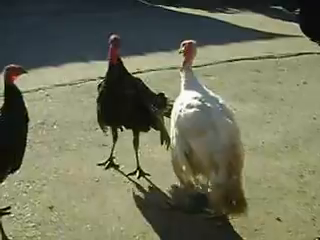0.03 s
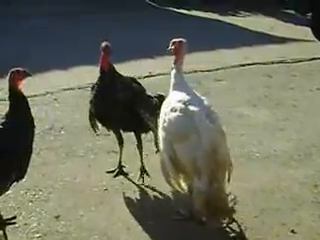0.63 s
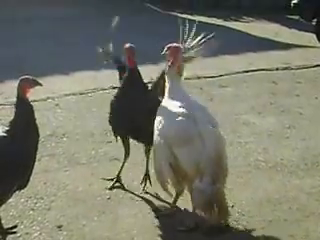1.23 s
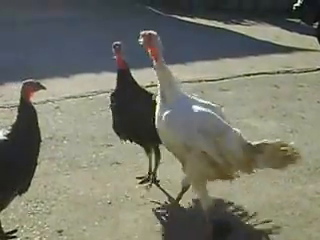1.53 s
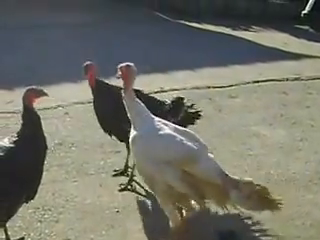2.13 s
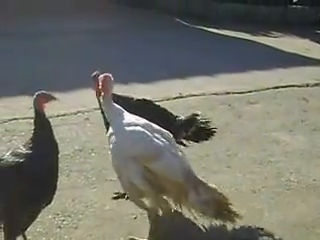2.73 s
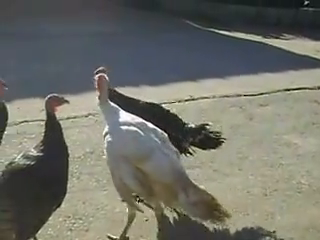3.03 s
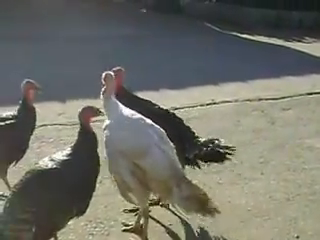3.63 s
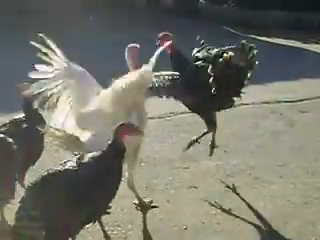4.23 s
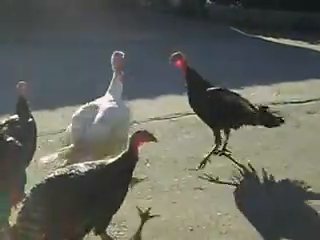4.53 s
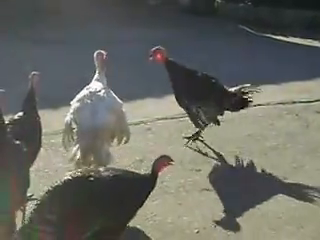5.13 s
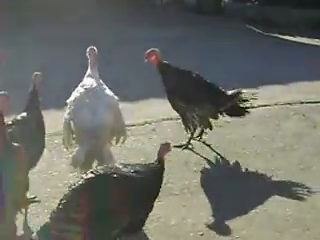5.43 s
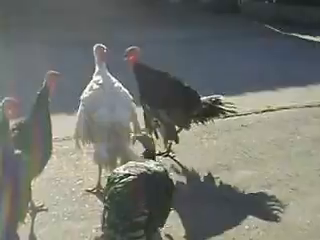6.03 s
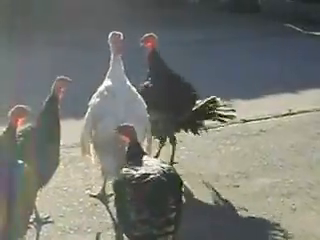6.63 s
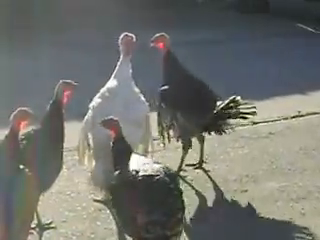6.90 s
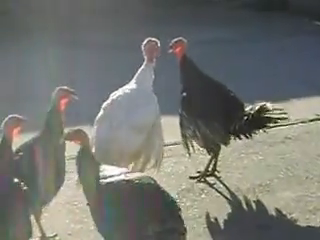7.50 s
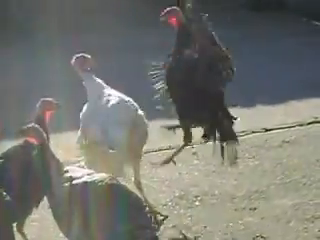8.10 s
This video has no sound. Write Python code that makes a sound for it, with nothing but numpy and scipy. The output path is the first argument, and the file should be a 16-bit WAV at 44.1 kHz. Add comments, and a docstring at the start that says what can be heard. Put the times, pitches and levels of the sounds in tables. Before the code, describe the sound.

Turkeys gobble and yelp in short rattling bursts in a paved yard, with a few flurries of slapping wings.

```python
"""A paved yard, where turkeys gobble at each other and squabble with beating wings.
A gobble opens with a falling whistle or a leaping cry, drops to a low held note and breaks into
a rattle with runs of sharp yelps. Feathers slap, wings push air and feet land on the pavement.
Walls echo the birds over faint outdoor air. The microphone is a small camera's: mono, with grit
that follows the loudness and with the treble cut."""
import sys
import numpy as np
from scipy import signal
from scipy.fft import rfft, irfft, next_fast_len
from scipy.io import wavfile

SR = 44100
rng = np.random.default_rng(int(sys.argv[2]) if len(sys.argv) > 2 else 0)


def output_pcm(signal):
    """Save a mono or channel-first signal as 16-bit PCM at the path in sys.argv[1].

    Samples are clipped to [-1, 1] before scaling.
    """
    pcm = np.clip(np.atleast_2d(signal).T, -1, 1) * 32767
    wavfile.write(sys.argv[1], SR, np.round(pcm).astype(np.int16))


N = 364266
TIME = np.arange(N) / SR


def gobbles(shake_hz=41.0, swing_octaves=.5, throb_db=2.0, flutter_db=3.5, crack_db=-16.5):
    """A whistling syrinx: a little roughness doubles its period, more shakes it into a rattle."""
    pitch, level_db, rough, second_db, gate = gobble_controls()
    doubling = np.clip(rough / .43, 0, 1)
    rattle = np.clip((rough - .32) / .35, 0, 1)
    # the shaking throat chops the tone into chirps, each starting high and dropping to the pitch
    shake = 2 * np.pi * np.cumsum(shake_hz * (1 + .4 * wander(25))) / SR
    pitch = pitch * 2 ** (rattle * swing_octaves * ((1 + np.cos(shake)) / 2) ** 2)
    pitch = pitch * (1 + .016 * wander(130) + .07 * rattle * wander(305))   # jitter
    level_db = level_db + rattle * throb_db * np.sin(shake)
    # even held notes crack for a moment now and then
    cracks = np.clip(wander(70) - 1, 0, 1)
    level_db += crack_db * cracks * (1 + doubling) / 2
    level_db += flutter_db * rough * wander(250)
    pitch, level_db = with_yelps(pitch, level_db)
    return gate * from_db(level_db) * syrinx(pitch, doubling, second_db)


def gobble_controls():
    """Pitch, level, roughness, second partial and gate; where notes meet, the louder one leads."""
    # Leaping cries. Each row: start and length in seconds, pitch aimed at in Hz, level in dB.
    cries = [(0.348, 0.021, 1143, -22.5), (0.654, 0.043, 1172, -16), (1.972, 0.11, 1061, -25.5),
             (3.017, 0.021, 1050, -26.5), (3.355, 0.0607, 1234, -17), (3.457, .1, 1230, -17),
             (4.409, 0.044, 1100, -24.5), (4.713, .052, 1209, -18.5), (7.233, .044, 1172, -17),
             (7.298, .04, 1050, -27.5), (7.575, 0.062, 1181, -13), (8.246, .05, 1090, -14)]
    # Low held notes. Each row: start and length in seconds, pitch in Hz, level in dB,
    # lift of the second partial in dB.
    holds = [(0.379, 0.078, 645.8, -16.5, 1), (0.914, 0.071, 812, -16.5, -3),
             (1.589, .018, 724, -14.5, 4.5), (1.655, 0.084, 599.8, -14, 6), (2.431, 0.14, 619, -13.5, 0.5),
             (3.038, 0.016, 666, -17.5, 1), (3.655, 0.091, 650.7, -15.5, 0),
             (4.764, 0.0319, 708.8, -15, 7.5), (5.112, 0.066, 621.4, -20.5, -6.5),
             (5.179, 0.0317, 654.6, -14.5, 5), (6.352, 0.089, 657.2, -21, -1.5),
             (7.346, 0.082, 631, -16, 7)]
    # Rattles. Each row: start and length in seconds, pitch in Hz, first and last level in dB.
    rattles = [(0, 0.093, 676.2, -22.5, -23.5), (0.471, 0.24, 649, -20, -17), (1.003, 0.17, 709, -25, -23),
               (1.74, 0.082, 617.2, -16.5, -20), (2.362, .07, 745, -20.5, -19),
               (2.589, 0.15, 620, -20.5, -19.5), (3.084, .365, 738.7, -24, -24.5),
               (3.77, .14, 795, -19.5, -19.5), (4.508, .2, 757.7, -22, -28), (4.81, 0.19, 700, -27.5, -33),
               (5.229, 0.2, 645.3, -20, -26.5), (5.915, 0.24, 677, -20.5, -32.5),
               (6.451, 0.21, 670.3, -26.5, -21), (6.805, .25, 760.4, -26.5, -29.5),
               (7.454, 0.17, 659, -19, -18), (7.866, 0.27, 706, -20, -26)]
    controls, weight, gate = np.zeros((4, N)), np.full(N, 1e-12), np.zeros(N)
    for shape, notes in ((cry, cries), (held_note, holds), (rattle_note, rattles)):
        for start, length, *row in notes:
            span, age, envelope = note_window(start, length, attack_s=.0038, release_s=.021)
            pitch, level_db, rough, second_db = np.broadcast_arrays(*shape(age, length, *row))
            power = (envelope * from_db(level_db)) ** 2
            controls[:, span] += power * [pitch, level_db, rough, second_db]
            weight[span] += power
            gate[span] += envelope
    return [*(controls / weight), np.minimum(gate, 1)]


def cry(age, length, top_hz, level_db, fade_db_per_s=78, rough=.1, second_db=-2.5):
    """The pitch leaps up, then sinks ever faster while the note fades."""
    leap_octaves = .5 * np.exp(-age / .011)
    sink_octaves = .6 * (age / .1) ** 2
    pitch = top_hz * 2 ** -(leap_octaves + sink_octaves)
    return pitch, level_db - fade_db_per_s * age, rough, second_db


def held_note(age, length, hz, level_db, second_db, rise_octaves_per_s=.585, swell_db_per_s=30):
    """Growing effort lifts pitch and level a little, until the note starts to break."""
    from_middle = age - length / 2
    pitch = hz * 2 ** (rise_octaves_per_s * from_middle)
    rough = np.interp(age, [0, length], [.171, .4])
    return pitch, level_db + swell_db_per_s * from_middle, rough, second_db


def rattle_note(age, length, hz, first_db, last_db, second_db=-.5):
    """The voice gets rougher toward the end of the gobble."""
    level_db = np.interp(age, [0, length], [first_db, last_db])
    rough = np.interp(age, [0, length], [.66, .85])
    return hz, level_db, rough, second_db


def yelps(gap_s=.05):
    """Time, pitch and level of every yelp; a run is filled at the bird's steady pace."""
    # Runs of sharp yelps. Each row: start and length in seconds (0 for a single yelp),
    # pitch in Hz, first level in dB, growth over the run in dB.
    yelp_runs = [(0.035, .048, 1290, -12, -1.5), (0.667, 0, 1113, -7, -2), (0.936, .04, 1280, -18, 2.5),
                 (1.038, .095, 1285, -11.5, 4), (1.762, .045, 1155, -12.5, 7.5),
                 (2.628, .106, 1120, -12, -2.5), (3.194, .148, 1210, -16, 4), (3.39, 0, 1123, -10, 4),
                 (3.826, .051, 970, -10.5, -1), (3.903, 0, 962, -6.5, 0), (4.552, .111, 1156, -15, -1),
                 (4.842, .117, 1120, -19.5, 1.5), (5.376, 0, 1249, -15, 0.5), (5.452, 0, 1203, -24, 3),
                 (6.039, .092, 1326, -22, 4.5), (6.558, .093, 1320, -14, 0), (6.813, .062, 1143, -17.5, 1),
                 (6.918, .095, 1230, -15, -0.5), (7.478, .058, 1150, -12.5, -3), (7.586, 0, 1132, -4, -3),
                 (7.951, 0, 1143, -11.5, 6), (8.052, .101, 1230, -14.5, 5)]
    for start, length, hz, level_db, growth_db in yelp_runs:
        count = round(length / gap_s) + 1
        yield from np.linspace((start, hz, level_db), (start + length, hz, level_db + growth_db), count)


def with_yelps(pitch, level_db, swoop_s=.0082, glide_octaves=.3, catch_db=-1.5):
    """The throat catches, yelps on a rising pitch, then chirps more softly on the way back down."""
    pitch, level_db = pitch.copy(), level_db.copy()
    for at_s, yelp_hz, yelp_db in yelps():
        span = slice(max(0, int((at_s - .06) * SR)), int((at_s + .06) * SR))
        width_s = .0031 * 2 ** ((yelp_db + 13) / 16)   # twice as long for every 16 dB louder
        for delay_s, direction, softer_db in ((.025, -1, -11.5), (0, 1, 0)):   # way down, yelp
            age = TIME[span] - at_s - delay_s
            chirp_hz = yelp_hz * 2 ** (direction * glide_octaves * np.tanh(age / swoop_s))
            pitch[span] += (chirp_hz - pitch[span]) * np.exp(-(age / swoop_s) ** 4)
            level_db[span] += catch_db * np.exp(-(age / width_s + 2) ** 2)
            level_db[span] += (yelp_db + softer_db - level_db[span]) * np.exp(-(age / width_s) ** 2)
    return pitch, level_db


def syrinx(pitch, doubling, second_db, half_db=-3.5):
    """Partials of the pitch, and weaker ones halfway between, shaped by the throat; unit power."""
    # Spectrum at the syrinx. Each row: multiple of the pitch, level in dB.
    partials = [(1, 4), (2, -4.5), (2.5, -7.5), (3, -15), (8, -50)]
    # Resonances of throat and beak. Each row: frequency in Hz, gain in dB.
    throat = [(450, -33), (600, -4), (750, 1.5), (950, -0.5), (1280, 7), (1600, 0), (1780, -11),
              (1950, -13), (2200, -4), (2500, -23), (4500, -13)]
    phase = 2 * np.pi * np.cumsum(pitch) / SR
    half_share = doubling * from_db(half_db + 2 * wander(29))
    voice, power = 0, 0
    for multiple in np.arange(1, 17) / 2:
        gain = gain_at(partials, multiple) * gain_at(throat, multiple * pitch)
        if multiple % 1:
            gain *= half_share
        if multiple == 2:
            gain *= from_db(second_db)
        voice += gain * np.sin(multiple * phase)
        power += gain ** 2 / 2
    return voice / np.sqrt(power)


def whistles(swell_db=3, swell_s=.035, flutter_db=3.5, waver_share=.03):
    """A reedy note swells as it falls, and grows unsteady toward its end."""
    # Whistles that open a gobble or answer one. Each row: start and length in seconds,
    # first and last pitch in Hz, level in dB, second partial in dB.
    notes = [(0.851, 0.07, 1039, 933, -20.5, -2.5), (1.233, 0.079, 1052, 1026, -27.5, -30),
             (1.282, .09, 872, 858, -25.5, -29), (1.546, 0.043, 1075, 898, -21.5, 2.5),
             (2.303, .062, 1019, 912, -21, -1), (3.088, 0.06, 1036, 991.6, -25, 1),
             (4.461, 0.04, 1059, 949, -18, -7), (5.816, 0.055, 1026, 943, -22, -12),
             (5.891, 0.016, 900, 780, -15, -8.5), (6.744, 0.062, 1130, 933, -26.5, -5),
             (7.838, 0.058, 1086, 1015, -19, -1.5)]
    # The whistle's other partials. Each row: multiple of the pitch, level in dB.
    partials = [(1, 5), (1.5, -16), (2.5, -23), (3, -16.5), (4, -21), (5, -23.5)]
    out, waver, flutter = np.zeros(N), wander(200), wander(170)
    for start, length, first_hz, last_hz, level_db, second_db in notes:
        span, age, envelope = note_window(start, length, attack_s=.005, release_s=.02)
        along = age / length
        pitch = (first_hz + (last_hz - first_hz) * along) * (1 + waver_share * along * waver[span])
        phase = 2 * np.pi * np.cumsum(pitch) / SR
        tone = sum(from_db(db) * np.sin(multiple * phase) for multiple, db in partials + [(2, second_db)])
        note_db = level_db + swell_db * (.5 - np.exp(-age / swell_s))
        note_db += flutter_db * along * flutter[span]
        out[span] += envelope * from_db(note_db) * rms_one(tone)
    return out


def note_window(start, length, attack_s, release_s):
    """The samples that a note covers, its age in them and its attack-hold-release envelope."""
    corners = [start - attack_s, start + attack_s, start + length, start + length + release_s]
    span = slice(*np.searchsorted(TIME, [corners[0], corners[-1]]))
    return span, np.clip(TIME[span] - start, 0, length), np.interp(TIME[span], corners, [0, 1, 1, 0])


def wings():
    """Stiff feathers slap and rustle, each adding its grain; the wing beats push air in dull thuds."""
    # Slaps of feathers and claws. Each row: start in seconds, level in dB.
    slap_times = [(0.246, -45), (1.395, -25), (2.074, -30.5), (4.090, -15), (4.099, -15.5), (4.139, -22),
                  (4.226, -47), (4.815, -30), (7.950, -21), (8.152, -25)]
    # Their bright spectrum. Each row: frequency in Hz, level in dB.
    slap_colour = [(150, 0), (600, -7.5), (1200, 5), (2300, 0.5), (3500, 2.5), (5200, 1.5), (6500, -22)]
    # Wing beats. Each row: start in seconds, level in dB.
    wing_beats = [(1.393, -14.5), (1.412, -42), (4.093, -21.5), (4.138, -19), (7.955, -15), (8.098, -23.5),
                  (8.145, -20.5)]
    # Spectrum of the pushed air. Each row: frequency in Hz, level in dB.
    thud_colour = [(40, -4.5), (120, -2), (280, -3.5), (650, 5.5), (1000, 4), (2000, -7.5), (5000, -33)]
    slaps = blows(slap_times, slap_colour, rise_s=.00026, t60=.08, grain_db=4.0)
    rustle = from_db(-22) * blows(slap_times, slap_colour, rise_s=.026, t60=.64, grain_db=3.0)
    thuds = blows(wing_beats, thud_colour, rise_s=.00087, t60=.17, grain_db=3.0)
    return slaps + rustle + thuds


def feet():
    """Feet land on the pavement with soft, low knocks."""
    # Footfalls. Each row: start in seconds, level in dB.
    footfalls = [(4.350, -21.5), (4.618, -24.5), (4.680, -24.5), (5.052, -30.5)]
    # Spectrum of a footfall. Each row: frequency in Hz, level in dB.
    foot_colour = [(60, -17), (160, -4), (280, 7.5), (400, -9), (600, -8.5), (2000, -32.5)]
    return blows(footfalls, foot_colour, rise_s=.0053, t60=.13, grain_db=2.5)


def blows(events, colour, rise_s, t60, grain_db):
    """Each blow is a puff of grainy noise that falls 60 dB in t60 seconds."""
    envelope = np.zeros(N)
    for start_s, level_db in events:
        start = int(start_s * SR)
        age = TIME[:min(SR // 2, N - start)]
        rise = 1 - np.exp(-age / rise_s)
        envelope[start:start + len(age)] += rise * from_db(level_db - 60 * age / t60)
    return envelope * rms_one(noise(colour) * from_db(grain_db * wander(270)))


def yard_echo(sound, t60=.41, tail_db=-8.0, build_s=.0076):
    """The walls send two echoes and a diffuse tail back to the microphone, all dulled."""
    age = TIME[:SR]
    tail = rng.standard_normal(SR) * from_db(-60 * age / t60) * (1 - np.exp(-age / build_s))
    response = from_db(tail_db) * tail / np.sqrt(np.sum(tail ** 2))
    for delay_s, echo_db in ((.024, -14.5), (.056, -18.5)):
        response[int(delay_s * SR)] += from_db(echo_db)
    dull = signal.butter(1, 3500, fs=SR, output="sos")
    return signal.fftconvolve(sound, signal.sosfilt(dull, response))[:N]


def outdoor_air(level_db=-48):
    """A faint, steady rush behind the birds."""
    # Spectrum of the open air. Each row: frequency in Hz, level in dB.
    air_colour = [(30, 4), (100, -6), (300, -5.5), (1200, -4), (2000, -10.5), (5500, -22.5)]
    return from_db(level_db) * noise(air_colour)


def from_db(db):
    """Decibels to gain."""
    return 10 ** (np.asarray(db) / 20)


def rms_one(x):
    """Scale to unit power."""
    return x / np.sqrt(np.mean(x ** 2) + 1e-20)


def gain_at(colour, hz):
    """Read a spectrum on a log-frequency axis."""
    points, level_db = np.transpose(colour)
    return from_db(np.interp(np.log(np.maximum(hz, 1)), np.log(points), level_db))


def noise(colour):
    """Steady noise of a given colour, unit power."""
    size = next_fast_len(N)
    hz = np.arange(size // 2 + 1) * SR / size
    return rms_one(irfft(rfft(rng.standard_normal(size)) * gain_at(colour, hz), size)[:N])


def wander(rate_hz):
    """Smooth random drift up to about rate_hz, unit power."""
    smooth = signal.butter(2, rate_hz, fs=SR, output="sos")
    return rms_one(signal.sosfilt(smooth, rng.standard_normal(N + SR))[SR:])


def high_pass(x, hz):
    """Steep cut below a frequency."""
    return signal.sosfilt(signal.butter(6, hz, "high", fs=SR, output="sos"), x)


def loudness_of(x, follow_s):
    """Running rms of a sound."""
    keep = np.exp(-1 / (follow_s * SR))
    return np.sqrt(signal.lfilter([1 - keep], [1, -keep], x ** 2) + 1e-12)


def scene():
    """What reaches the microphone: calls, wings and feet, their echo and faint outdoor air."""
    calls = gobbles()
    squabble = wings() + feet()
    birds = high_pass(calls + whistles(), hz=530) + squabble   # a small beak radiates almost no bass
    return (birds + yard_echo(birds) + outdoor_air())[None]


def record(dry, grit_db=-12.5, edge_db=-14, edge_hz=2700, cutoff_hz=6300):
    """The camera adds grit and a reedy edge that follow the loudness, rounds peaks and cuts treble."""
    # Spectrum of the camera's grit. Each row: frequency in Hz, level in dB.
    grit_colour = [(30, -0.5), (3500, 4), (5200, 1), (6200, -14)]
    loudness = loudness_of(dry, follow_s=.0015)
    # sudden rises crackle more than held notes
    suddenness = np.sqrt(loudness / loudness_of(dry, follow_s=.012))
    grit = from_db(grit_db + 2 * wander(390)) * loudness * suddenness * noise(grit_colour)
    # squaring off the wave gives high overtones that stay locked to the voice
    edge = from_db(edge_db) * high_pass(loudness * np.tanh(2 * dry / loudness), edge_hz)
    rounded = 1.366 * np.tanh((dry + grit + edge) / 1.345)
    return signal.sosfilt(signal.butter(20, cutoff_hz, fs=SR, output="sos"), rounded)


dry = scene()
out = record(dry)
output_pcm(out)
```